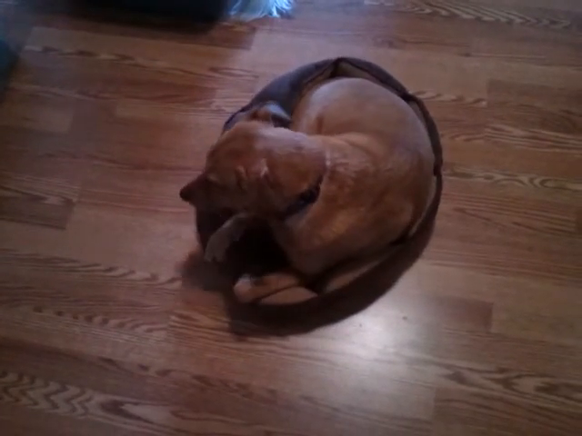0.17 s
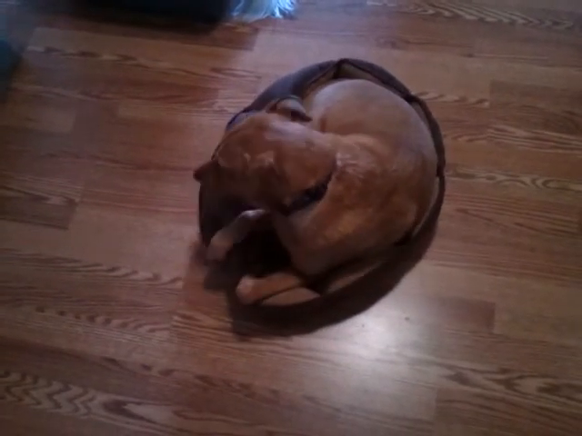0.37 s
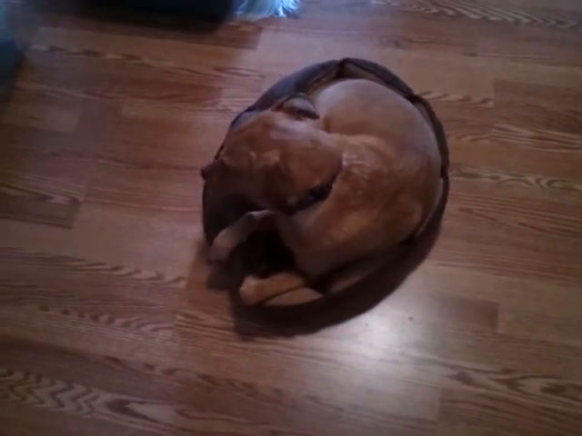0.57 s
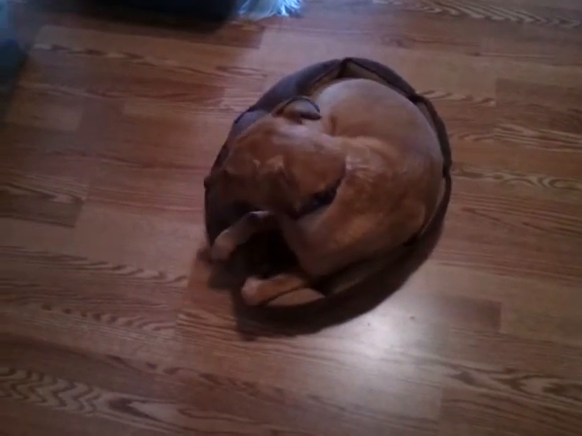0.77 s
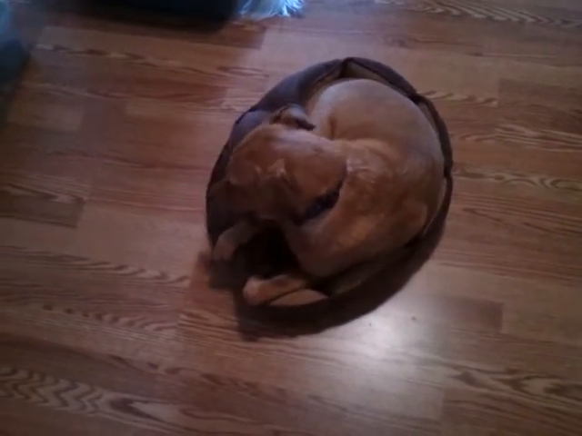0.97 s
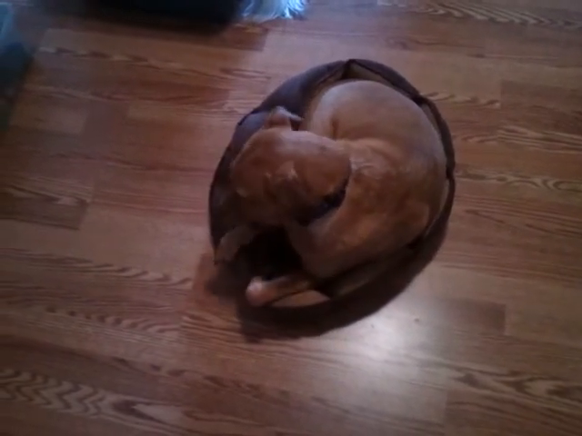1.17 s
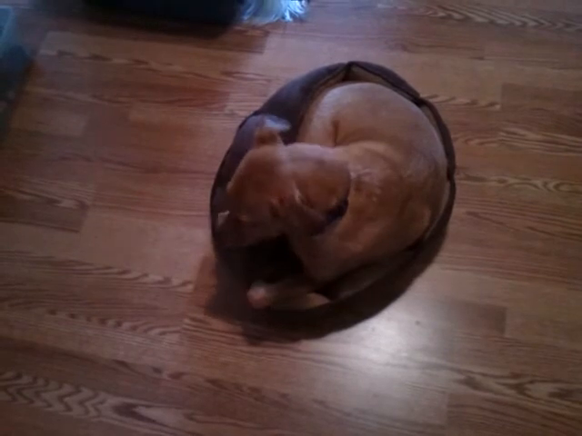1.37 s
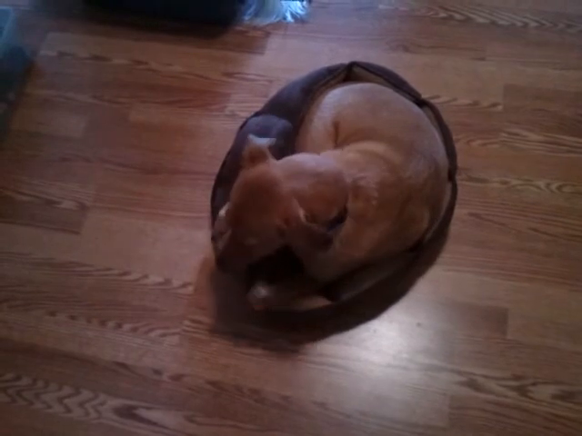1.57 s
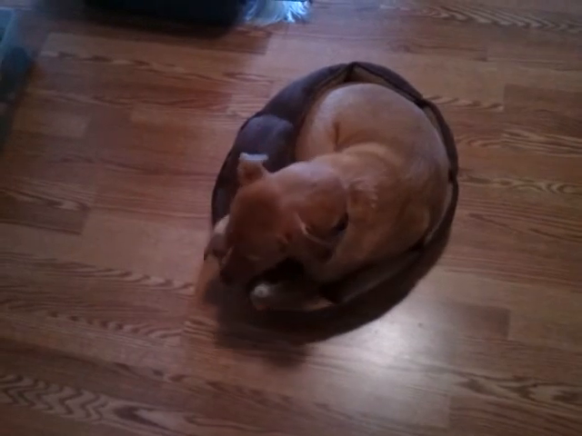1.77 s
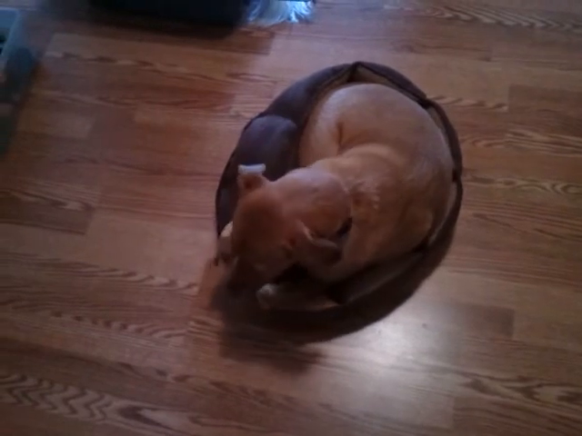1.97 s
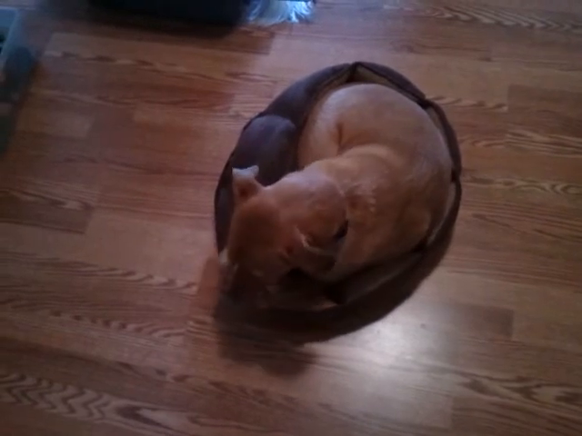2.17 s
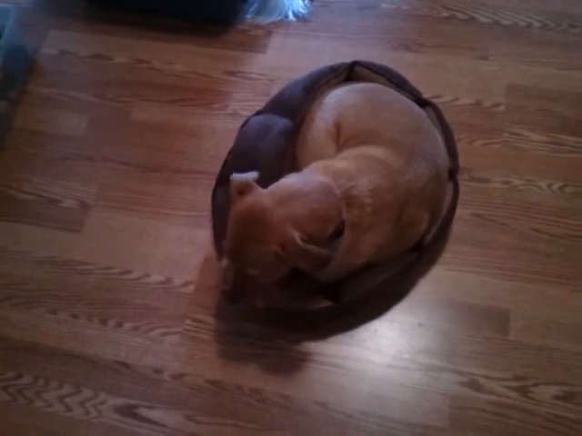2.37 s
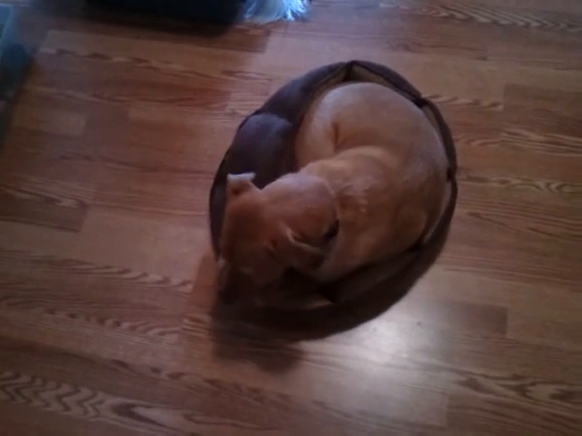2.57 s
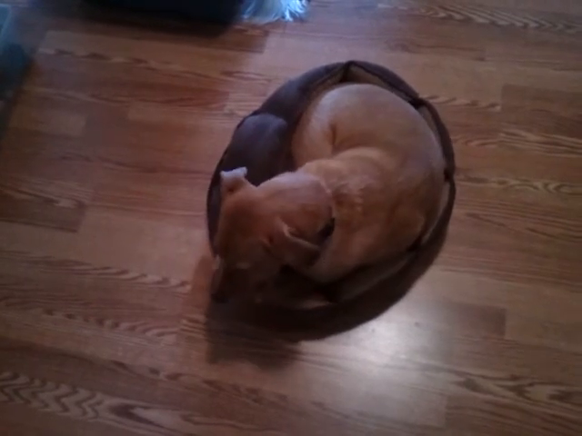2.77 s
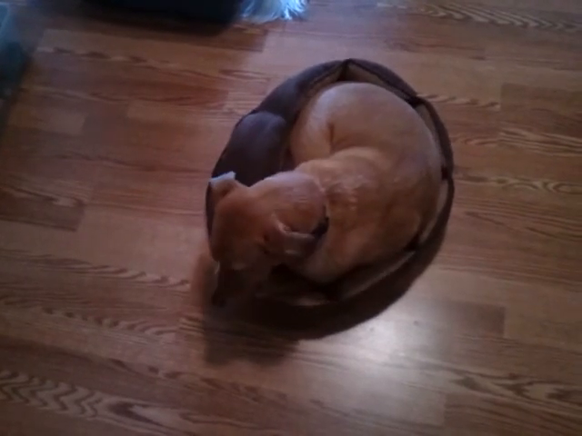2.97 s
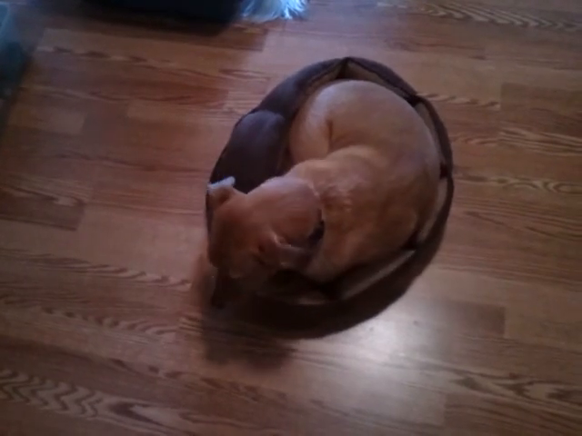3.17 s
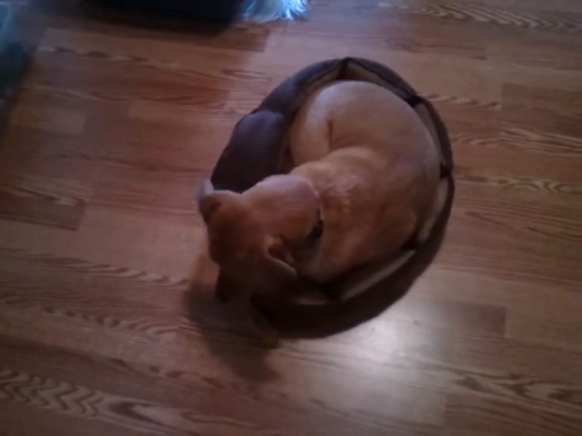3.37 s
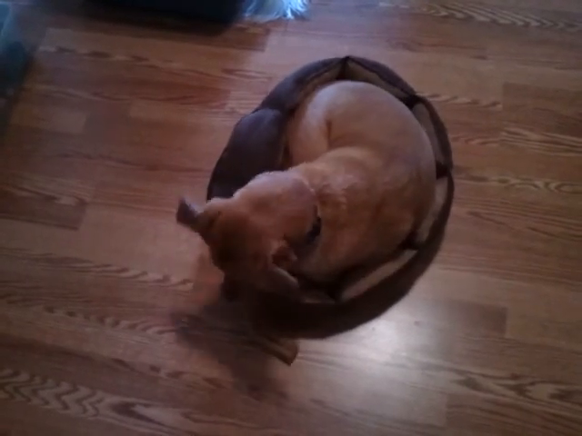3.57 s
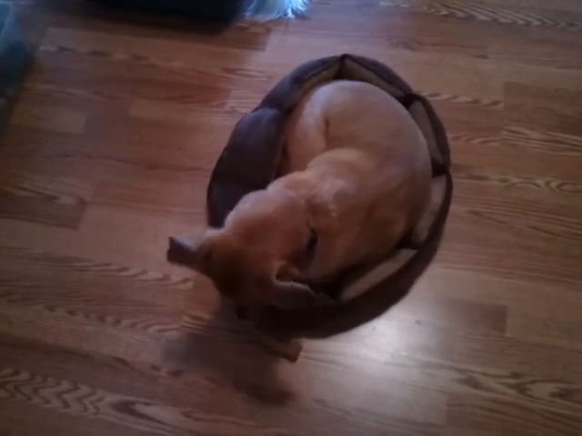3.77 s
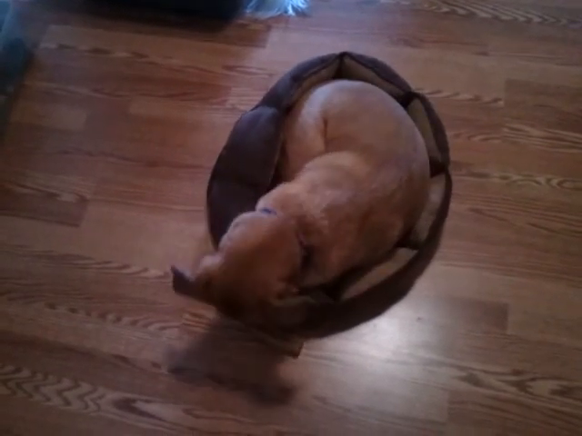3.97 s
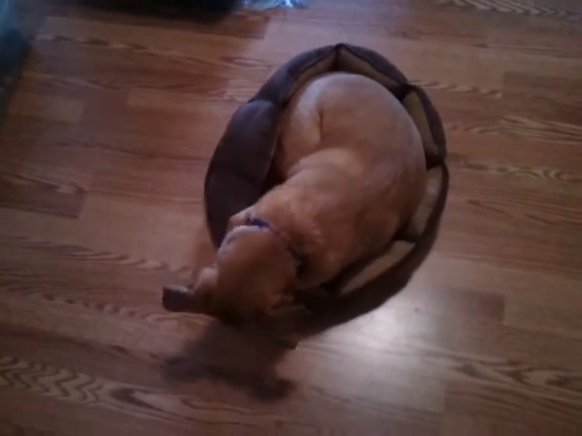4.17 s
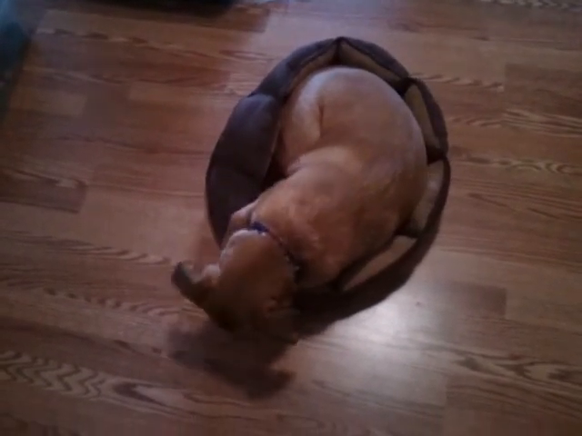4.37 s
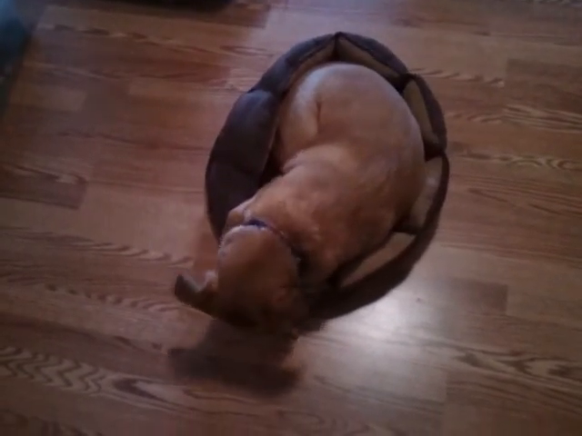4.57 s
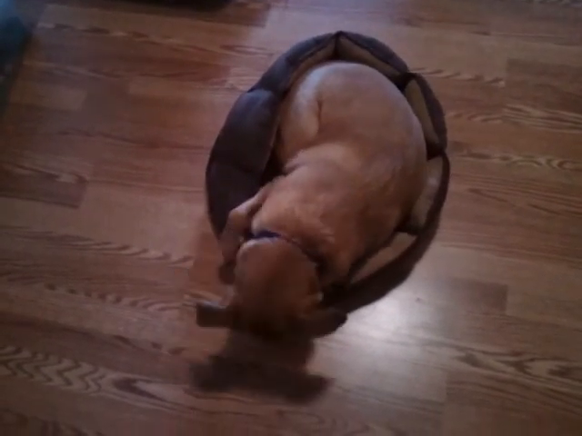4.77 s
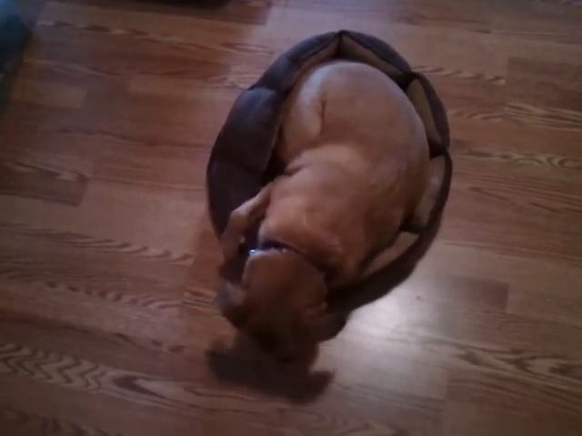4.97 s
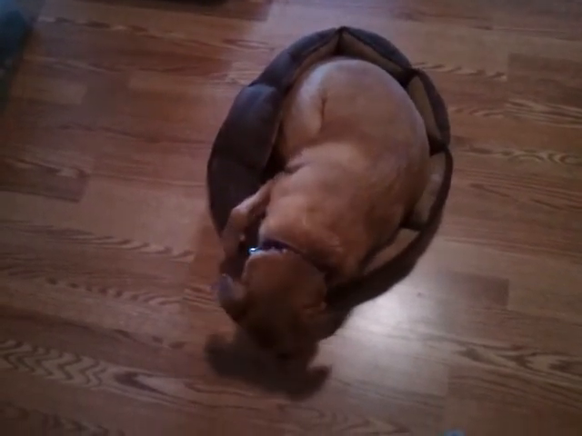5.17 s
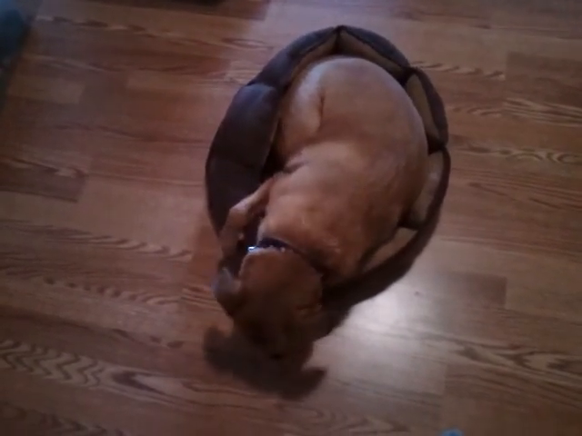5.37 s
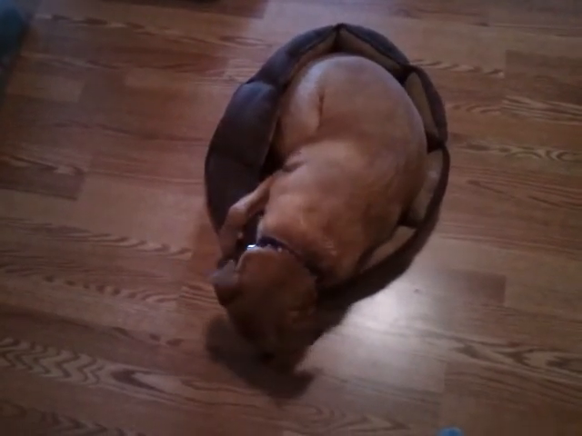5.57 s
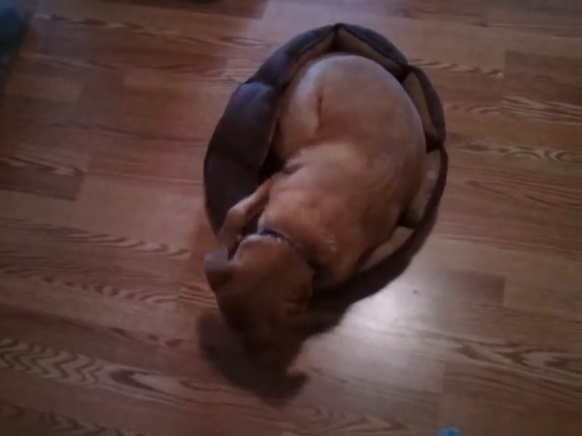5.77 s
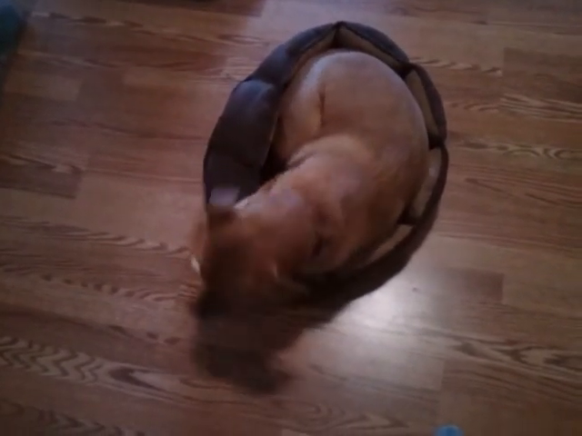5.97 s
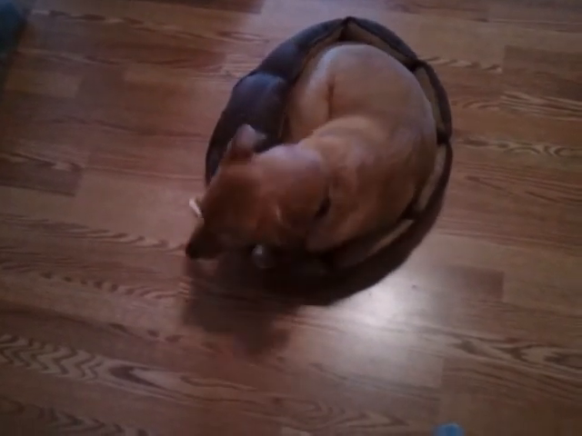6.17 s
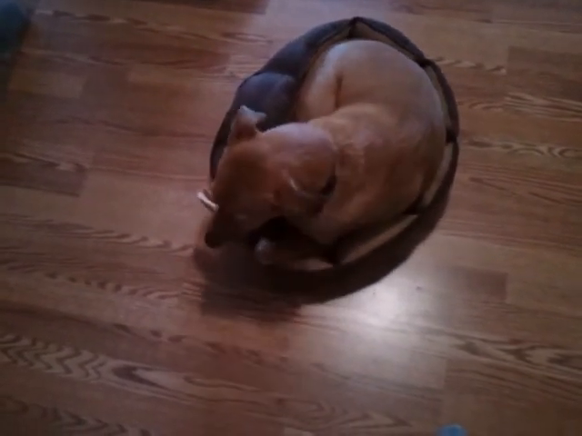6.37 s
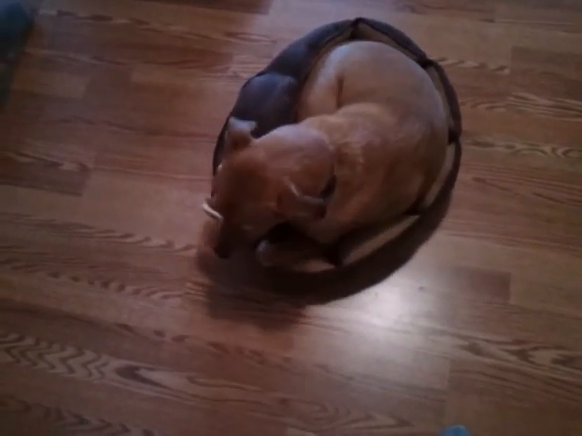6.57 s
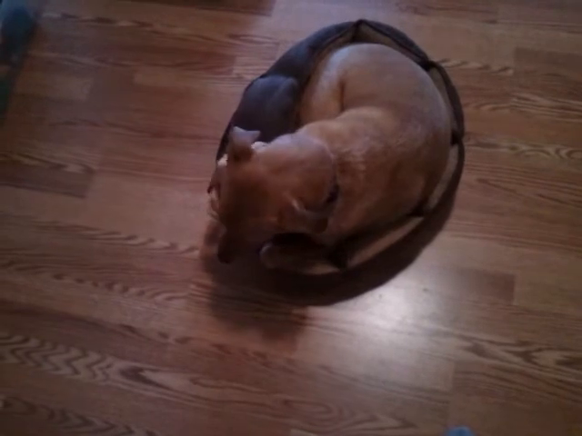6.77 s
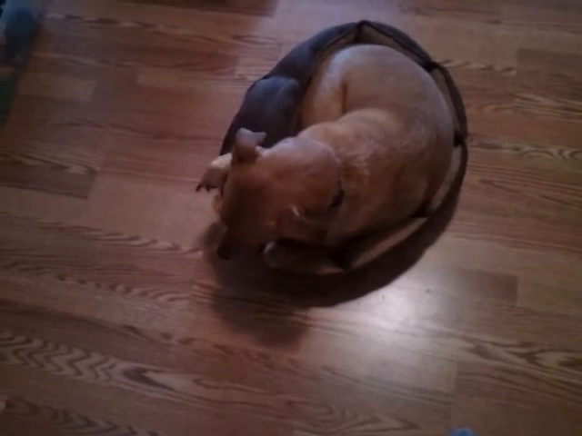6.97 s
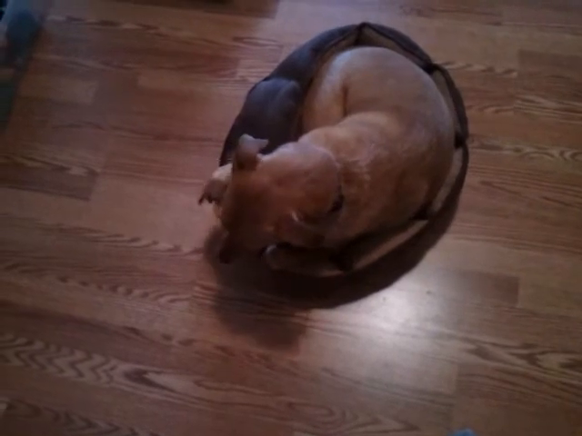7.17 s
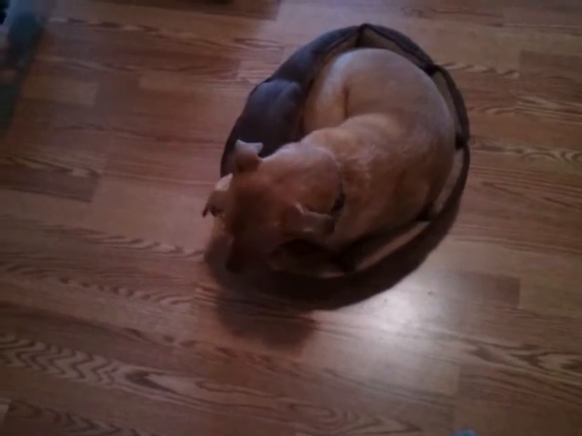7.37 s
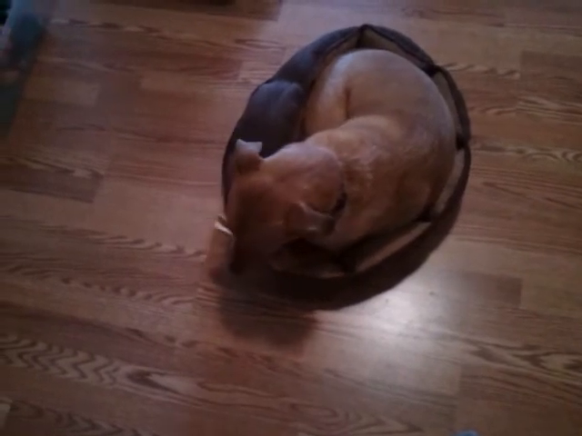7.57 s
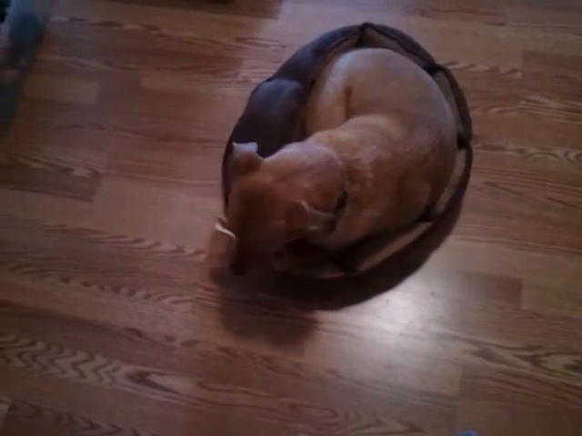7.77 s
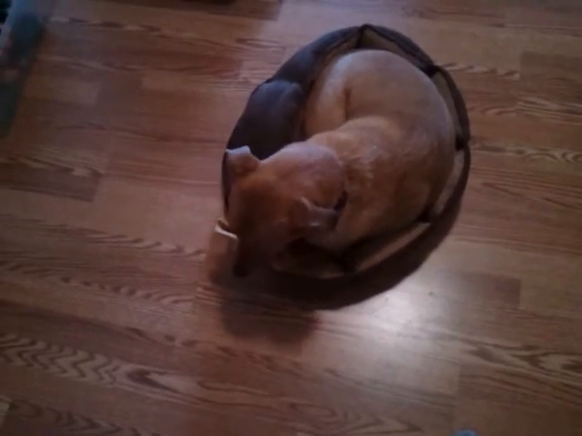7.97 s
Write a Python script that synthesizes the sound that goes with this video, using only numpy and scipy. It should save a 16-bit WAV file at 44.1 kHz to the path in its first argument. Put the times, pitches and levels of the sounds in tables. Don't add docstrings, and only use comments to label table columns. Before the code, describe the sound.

A dog gnaws a hard hollow bone indoors, with faint tooth ticks, then a burst of very loud clattering knocks ringing through a bare, hissy room.

```python
import sys
import numpy as np
from scipy import signal
from scipy.io import wavfile
from scipy.ndimage import uniform_filter1d

SR = 44100
rng = np.random.default_rng(int(sys.argv[2]) if len(sys.argv) > 2 else 0)


def to_wav(s):
    ch = np.atleast_2d(s).T
    pcm = np.round(np.clip(ch, -1, 1) * 32767)
    wavfile.write(sys.argv[1], SR, pcm.astype(np.int16))


def magnitude_from_level(level_db):
    exponent = np.asarray(level_db, float) / 20
    return 10 ** exponent


N = 354113

# [f/Hz, level/dB per Hz]
HISS_COLOUR = [(12, -33), (17, -3), (27, -21), (192, -19.5), (409, -15), (840, -18.5), (3390, -24),
               (6680, -24.5)]
# [t/s, level/dB]
AIR_LEVEL = [
    (0., -63.5),
    (.8, -62.5),
    (1.3, -59),
    (1.7, -62),
    (4., -61.5),
    (6.1, -59.5),
    (8.03, -63),
]
# [peak t/s, rumble level/dB, thud level/dB, fade/s]
WEIGHT_SHIFTS = [(1.879, -57, -68, .03), (2.7, -57.5, -46, 0.067), (3.0, -65, -60, .05),
                 (3.24, -52, -37.5, .04), (3.35, -66, -40, 0.069), (3.47, -55.5, -46, 0.087),
                 (3.75, -71.5, -57, 0.032), (4.79, -64, -61, 0.038), (5.14, -67, -57.5, .08),
                 (5.46, -58, -41.5, 0.06), (5.55, -57, -53, .06), (5.84, -55, -74.5, 0.089),
                 (6.51, -59, -65, .08), (7.07, -57.5, -61.5, 0.078), (7.56, -57.5, -61, 0.089),
                 (7.69, -60, -50.5, 0.22), (8.02, -59, -65, 0.02)]
# [t/s, level/dB, f/Hz]
SHELL_CLICKS = [
    (1.1548, -46.5, 5800),
    (7.3756, -43, 5950),
    (7.7437, -35, 5800),
]
# [delay/s, level/dB]
CLICK_REPEATS = [(0., 8), (.0008, -5.5), (.0016, -2), (.0093, -13)]
# [f/Hz, width/Hz, level/dB]
DULL_CLOTH = [(330, 130, -4), (483, 270, 5.5), (890, 470, 1)]
MIDDLE_CLOTH = [(1450, 650, 0.3), (2300, 640, 0.4), (3300, 1100, -7)]
BRIGHT_CLOTH = [(4420, 1200, -2), (5650, 710, -1.5), (6700, 2000, -1)]
# [t/s, level/dB, hold/s, dull part level/dB, bright part level/dB]
PAW_SLAPS = [
    (2.913, -68.5, 0.049, -7, 10),
    (5.088, -67, .07, 19., 0),
    (5.445, -53.5, 0.12, 8.5, 1.5),
    (6.473, -51, 0.076, -7.5, -9.5),
    (7.066, -46.5, 0.046, -26, -1),
    (7.674, -41, 0.088, -9, -1.5),
]
# [t/s, level/dB, hold/s, dull part level/dB, bright part level/dB]
CLOTH_DRAGS = [(2.666, -44.5, 0.084, 3, -14), (2.807, -66, 0.12, -8.5, 6), (2.977, -52.5, 0.18, -9, -1),
               (5.011, -68.5, 0.055, 13.5, 3), (5.244, -62, 0.026, -8, 4.5), (6.419, -64.5, 0.027, -1.5, 0),
               (6.828, -60, 0.17, -1.5, -5.5), (7.081, -47.5, 0.093, 2, -4.5), (7.18, -54, 0.057, 3.5, 0.5),
               (7.458, -55, 0.1, -14, -0.5), (7.512, -56, 0.23, 0.5, -12), (7.793, -69.5, 0.21, 12, -14)]
# [t/s, level/dB, hold/s]
BONE_GRINDS = [
    (7.088, -37.5, 0.069),
    (7.211, -54, 0.037),
]
# [f/Hz, width/Hz, level/dB]
GRIND_MODES = [(515, 50, 1), (700, 220, 2), (1530, 110, -2), (2200, 100, -3.5), (3620, 230, -1.5)]
# [t/s, level/dB, f/Hz, width/Hz, room share/dB]
BONE_SPLINTERS = [(.894, -40.5, 940, 201, 17.5), (.9027, -27, 990, 45, 2.5), (0.9027, -33, 2900, 500, -11),
                  (.903, -42.5, 3860, 495, 7), (0.905, -30, 1450, 400, -1.5), (.9085, -25, 2080, 197, -7),
                  (.908, -33.5, 6700, 1200, -3), (2.681, -40.5, 2200, 800, 9.5),
                  (2.683, -39.5, 3100, 700, 7), (2.684, -43, 5340, 1000, 5), (3.291, -15, 2950, 1200, 0.5),
                  (3.309, -19, 3000, 1200, 2.5), (3.331, -15.5, 2915, 1407, 5), (4.768, -48, 3400, 400, 1),
                  (4.769, -45, 4700, 500, -0.7), (4.766, -43.5, 1330, 249, 0.8),
                  (5.5435, -37.5, 1330, 250, -1.5), (5.102, -51.5, 850, 200, -4),
                  (5.447, -31.5, 6800, 1500, -4.8), (5.545, -47.5, 3300, 397, 3),
                  (5.5465, -34.5, 4560, 500, -14)]
# [t/s, level/dB, f/Hz, width/Hz]
TOOTH_NIBBLES = [(1.224, -56.5, 940, 70), (1.29, -67, 2500, 60), (1.324, -63, 2600, 40),
                 (1.333, -58, 2390, 100), (1.472, -53, 3600, 900), (1.842, -57, 3420, 60),
                 (1.844, -38.5, 6680, 350), (1.845, -59, 2300, 300), (2.098, -56, 2300, 300),
                 (2.396, -49, 910, 147), (3.765, -51.5, 5330, 900), (4.172, -61, 990, 700),
                 (4.338, -56, 6520, 601), (7.323, -50.5, 2820, 120)]
# [t/s, level/dB, f/Hz, width/Hz]
AWAY_TICKS = [
    (1.376, -56.5, 6700, 900),
    (3.965, -51.5, 5760, 1792),
    (4.272, -63, 5070, 602),
    (7.328, -51.5, 6700, 1200),
]
# [t/s, level/dB, f/Hz]
BONE_ROCKS = [
    (2.789, -50.5, 850),
    (2.799, -49.5, 892),
    (2.817, -42.5, 885),
    (2.84, -48.5, 890),
    (2.868, -45, 837),
    (2.895, -54, 890),
    (2.929, -55.5, 890),
]
# [t/s, level/dB, f/Hz]
LOW_THUMPS = [
    (0.904, -39, 340),
    (2.678, -38.5, 374),
    (3.751, -57, 220.6),
    (4.767, -43, 330),
    (5.084, -47.5, 395),
    (5.144, -40.5, 340),
    (5.146, -41, 226),
    (5.443, -46.5, 189.2),
]
# [t/s, blow level/dB, body f/Hz, crack level/dB, tick level/dB], last two against the body
BONE_KNOCKS = [(0.9018, -29, 935, -7.5, -11.5), (2.679, -43.5, 596, 3.5, -4),
               (3.1945, -2.5, 727, -9.5, -15.5), (3.2724, -14.5, 780, -7, -30.5),
               (3.2822, -6, 730, -0.5, -6.5), (3.3797, -13, 690, -9.5, -16),
               (3.46, -9.5, 765, -10.5, -27.5), (4.7648, -25, 730, -16, -22.5),
               (5.0827, -45, 738, -25, -16), (5.128, -35.5, 655, -34, -27), (5.1412, -22.5, 655, -24, -26),
               (5.444, -36.5, 876, -25.5, -12), (5.5423, -13.5, 730, -19, -30.5)]
# [f/Hz, width/Hz, level/dB]
CRACK_MODES = [(1450, 630, -2.5), (2200, 430, -3.5), (3100, 1200, 0.5)]
TICK_MODES = [(4210, 1100, 1.6), (6530, 800, -5.5)]
# [f/Hz, width/Hz, level/dB]
BOARD_MODES = [(340, 17, -9.5), (448, 8.4, -13), (540, 12., -9.5), (667.3, 7.4, 0), (730, 8.4, -7),
               (800, 11., 0), (926, 9.9, -11.5), (1330, 21, -11.5)]
# [delay/s, level/dB]
WALL_ECHOES = [(.0038, -2.5), (.006, -11), (.0085, -13), (0.0097, -11.5), (.019, -8.5)]
# [f/Hz, time to fall 60 dB/s, level/dB]
ROOM_TAIL = [(120, 0.13, -24), (330, .5, 2.5), (604, 0.37, 1.5), (850, 0.36, 3.5), (1200, 0.42, 3.5),
             (2500, .38, 5.5), (4997, 0.41, 3.5), (7400, 0.22, 9)]


def evened(x):
    return x / np.sqrt(np.mean(x ** 2) + 1e-20)


def read(hz_points, values, hz):
    return np.interp(np.log(hz + 1), np.log(hz_points + 1), values)


def add(mix, s, sound):
    part = mix[round(s * SR):][:len(sound)]
    part += sound[:len(part)]


def ring(hz, width, t):
    swing = np.sin(2 * np.pi * hz * t)
    fade = np.exp(-np.pi * width * t)
    soft_start = 1 - np.exp(-t * hz * 4)
    wave = swing * fade * soft_start
    return wave / abs(wave).max()


def through(modes, x):
    t = np.arange(SR // 2) / SR
    body = sum((-1) ** k * magnitude_from_level(db) * ring(hz, width, t) for k, (hz, width, db) in enumerate(modes))
    return signal.oaconvolve(x, body)[:len(x)]


def band_noise(lo_hz, hi_hz):
    band = signal.butter(2, [lo_hz, hi_hz], "band", fs=SR, output="sos")
    return evened(signal.sosfilt(band, rng.standard_normal(N)))


def stroke(s, rise, hold):
    t = np.arange(N) / SR - s
    return np.clip(t / max(rise, .001), 0, 1) * np.exp(-np.maximum(t - rise, 0) / max(hold, .005))


def smear(x, pole):
    return signal.sosfilt(np.tile([-pole, 1, 0, 1, -pole, 0], (12, 1)), x)


def hiss():
    frames, hz = N // 256 + 5, np.fft.rfftfreq(1024, 1 / SR)
    real, imaginary, patches = rng.standard_normal((frames, 513, 3)).T
    patches = evened(uniform_filter1d(uniform_filter1d(patches, 20, 0), 16, 1))
    colour_db = read(*np.transpose(HISS_COLOUR), np.minimum(hz, 6600)) - 60 * (hz > 9000)
    spectrum = (real + 1j * imaginary) * magnitude_from_level(colour_db[:, None] + 1.6 * patches)
    noise = signal.istft(spectrum, nperseg=1024, noverlap=768)[1][:N]
    level_db = np.interp(np.arange(N) / SR, *np.transpose(AIR_LEVEL)) + 0.5
    return magnitude_from_level(level_db) * evened(noise)


def weight():
    rise_s, rest_rumble_db, rest_thud_db = .04, -71.5, -66.5
    t = np.arange(N) / SR
    rumble, thud = np.full(N, magnitude_from_level(rest_rumble_db)), np.full(N, magnitude_from_level(rest_thud_db))
    for s, rumble_db, thud_db, fade in WEIGHT_SHIFTS:
        rise = np.clip(1 + (t - s) / rise_s, 0, 1) ** 2
        swell = rise * np.exp(-np.maximum(t - s, 0) / max(fade, .005))
        rumble = np.hypot(rumble, magnitude_from_level(rumble_db) * swell)
        thud = np.hypot(thud, magnitude_from_level(thud_db) * swell)
    return rumble * band_noise(20, 70) + thud * band_noise(100, 270)


def clicks():
    out, t = np.zeros(N), np.arange(400) / SR
    for s, level_db, hz in SHELL_CLICKS:
        snap = ring(hz, 1000.0, t) * np.minimum(t / .00025, 1)
        for delay, db in CLICK_REPEATS:
            add(out, s + delay, magnitude_from_level(level_db + 7.0 + db) * snap)
    return out


def scuffs():
    slap_rise_s, drag_rise_s = .005, .022
    grains = rng.standard_normal(N) * magnitude_from_level(2.7 * np.minimum(rng.exponential(1, N), 5))
    dull = evened(through(DULL_CLOTH, grains))
    middle = evened(through(MIDDLE_CLOTH, grains))
    bright = evened(through(BRIGHT_CLOTH, grains))
    bone = evened(through(GRIND_MODES, grains))
    out = np.zeros(N)
    for s, level_db, hold in BONE_GRINDS:
        out += magnitude_from_level(level_db) * stroke(s, slap_rise_s, hold) * bone
    for rise, rows in ((slap_rise_s, PAW_SLAPS), (drag_rise_s, CLOTH_DRAGS)):
        for s, level_db, hold, dull_db, bright_db in rows:
            cloth = magnitude_from_level(dull_db) * dull + middle + magnitude_from_level(bright_db) * bright
            out += magnitude_from_level(level_db) * stroke(s, rise, hold) * cloth
    return out


def chip_rows():
    rows = list(BONE_SPLINTERS)
    rows += [(*row, -3.5) for row in TOOTH_NIBBLES]
    rows += [(*row, 6.5) for row in AWAY_TICKS]
    rows += [(*row, 52, -7.5) for row in BONE_ROCKS]
    rows += [(s, db, hz, .45 * hz, 2.5) for s, db, hz in LOW_THUMPS]
    return rows


def chips():
    direct, feed = np.zeros((2, N))
    t = np.arange(4000) / SR
    for s, level_db, hz, width, room_db in chip_rows():
        chip = ring(hz, width, t)
        add(direct, s, magnitude_from_level(level_db + 8.5) * chip)
        add(feed, s, magnitude_from_level(level_db + 7 + room_db) * chip)
    return direct, feed


def knocks():
    bounce_s, bounce_db, room_db = .0045, -.8, 0.6
    low, high, feed, push = np.zeros((4, N))
    t = np.arange(1500) / SR
    tap = 1. * (t == 0)
    crack, tick = through(CRACK_MODES, tap), through(TICK_MODES, tap)
    small = signal.butter(2, [380, 1200], "band", fs=SR, output="sos")
    for s, blow_db, hz, crack_db, tick_db in BONE_KNOCKS:
        swing = -ring(1.034 * hz, 290.0, t) - 0.1 * ring(.5 * hz, 160., t)
        body = signal.sosfilt(small, swing)
        treble = magnitude_from_level(crack_db) * crack + magnitude_from_level(tick_db) * tick
        add(low, s, magnitude_from_level(blow_db + 4.5) * body)
        add(low, s + bounce_s, magnitude_from_level(blow_db + 2.5 + bounce_db) * body)
        add(high, s, magnitude_from_level(blow_db + 4.5) * treble)
        add(feed, s, magnitude_from_level(blow_db + room_db) * (0.75 * body + 1.61 * treble))
        add(push, s + 0.0022, magnitude_from_level(blow_db + room_db) * np.hanning(12) / 6)
    return low, high, feed, through(BOARD_MODES, push)


def echoes(x):
    out = np.zeros(N)
    for delay, db in WALL_ECHOES:
        x = smear(x, .55)
        add(out, delay, magnitude_from_level(db) * x)
    return out


def room(x):
    taps = np.zeros(SR)
    at = np.arange(60, SR - 12, 12)
    taps[at + rng.integers(0, 12, len(at))] = rng.choice([-1., 1.], len(at))
    hz, t, spectrum = signal.stft(taps, SR, nperseg=256)
    band_hz, t60, band_db = np.transpose(ROOM_TAIL)
    start_db = read(band_hz, band_db, hz)[:, None]
    fall_db = start_db - 60 * t / read(band_hz, t60, hz)[:, None]
    tail = signal.istft(spectrum * magnitude_from_level(fall_db), SR, nperseg=256)[1][:SR]
    tail = tail * np.clip((np.arange(SR) / SR - .002) / 0.0037, 0, 1)
    return signal.fftconvolve(x, tail / np.linalg.norm(tail))[:N]


def scene():
    low, high, feed, board = knocks()
    chip, chip_feed = chips()
    cloth = scuffs()
    shaded = signal.sosfilt(signal.butter(2, 2400, fs=SR, output="sos"), high)
    direct = low + magnitude_from_level(-3.0) * shaded + chip + magnitude_from_level(-2.5) * cloth + clicks() + magnitude_from_level(-12.5) * board
    early = echoes(magnitude_from_level(-13) * low + magnitude_from_level(5.5) * high + magnitude_from_level(-6.5) * chip)
    late = room(magnitude_from_level(8.5) * feed + magnitude_from_level(4) * chip_feed + magnitude_from_level(-7.5) * cloth)
    return (direct + early + late + weight() + hiss())[None]


def band_limit(x):
    return signal.sosfilt(signal.butter(12, 8320, fs=SR, output="sos"), x)


def record(dry):
    ceiling, edge_hz, offset = .93, 7400, -.0018
    edge = signal.firwin(161, edge_hz, window=("kaiser", 6.5), fs=SR)[None]
    limited = signal.oaconvolve(np.clip(dry, -ceiling, ceiling), edge, "same")
    mix = np.clip(limited + offset, -1, 1)
    return band_limit(mix)


dry = scene()
out = record(dry)
to_wav(out)
```